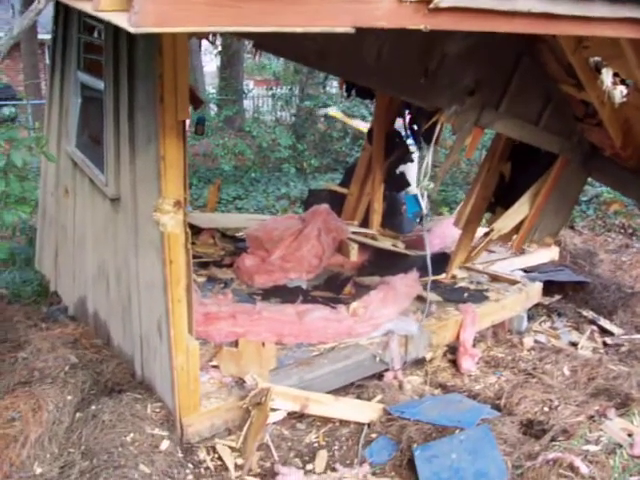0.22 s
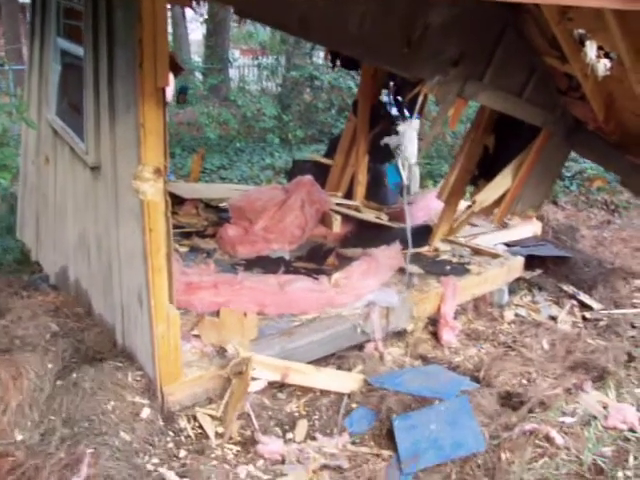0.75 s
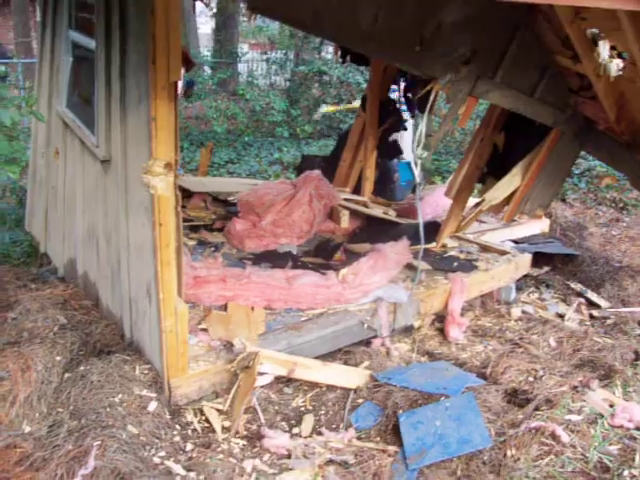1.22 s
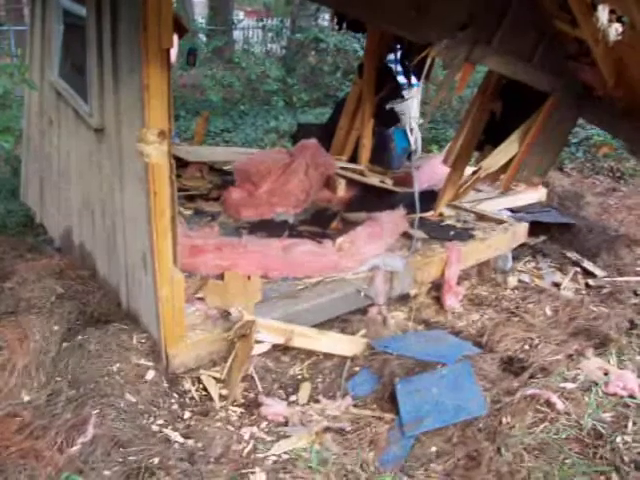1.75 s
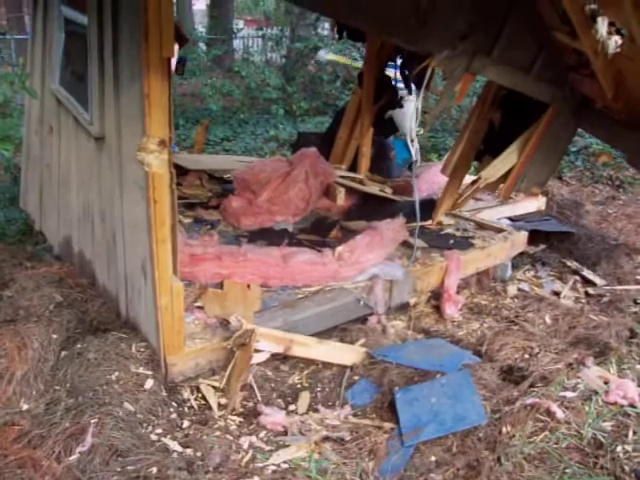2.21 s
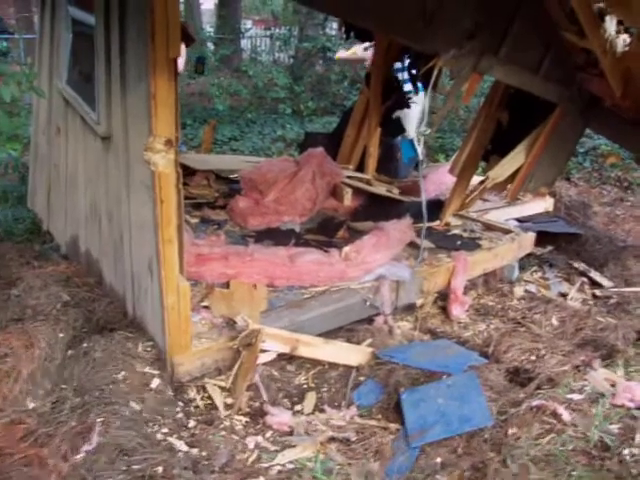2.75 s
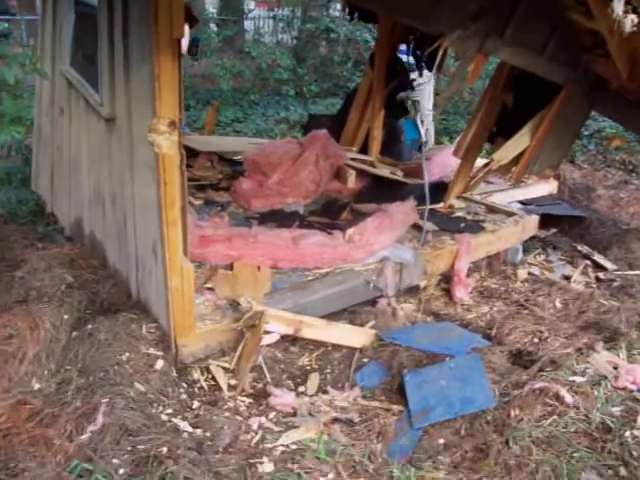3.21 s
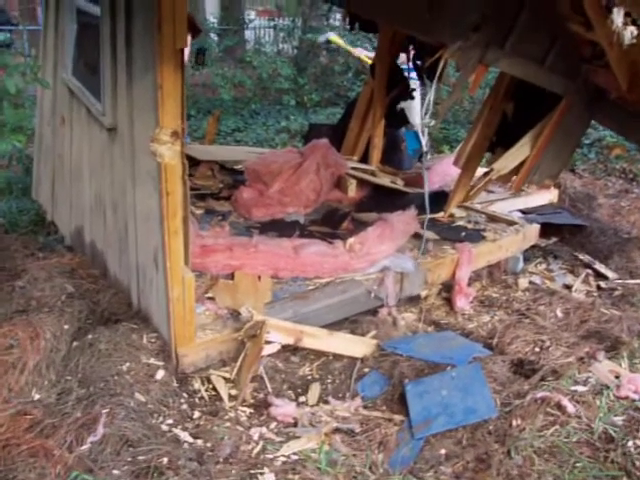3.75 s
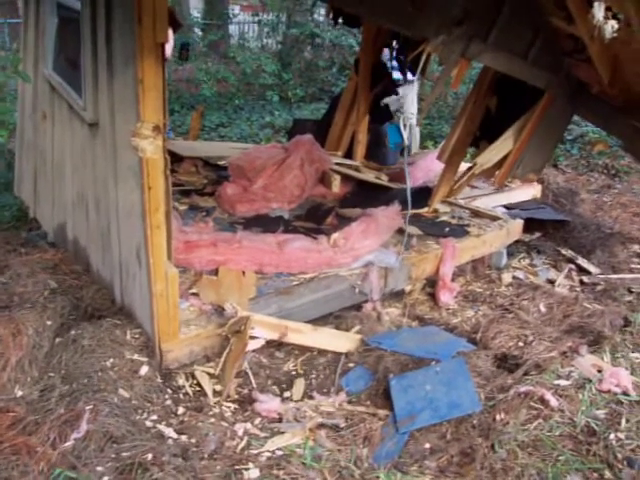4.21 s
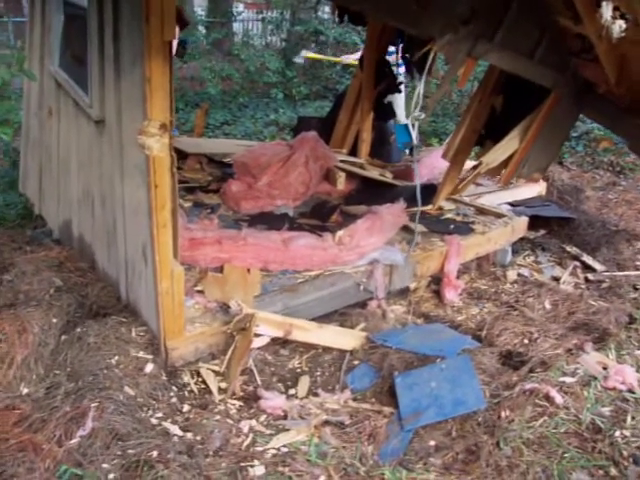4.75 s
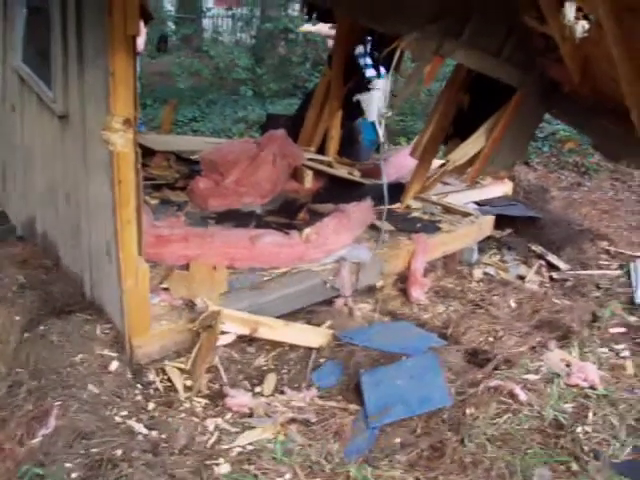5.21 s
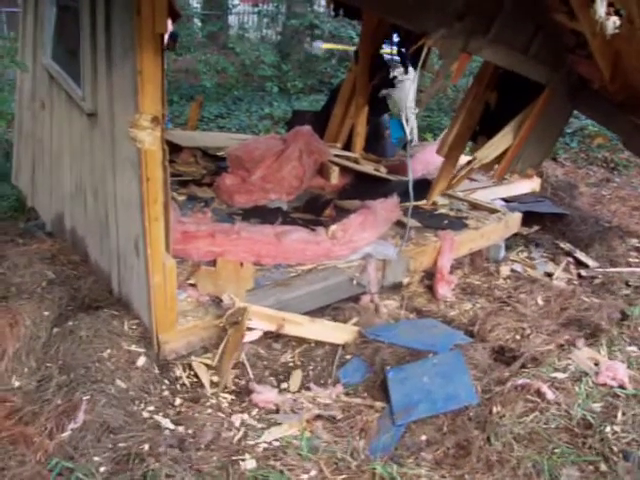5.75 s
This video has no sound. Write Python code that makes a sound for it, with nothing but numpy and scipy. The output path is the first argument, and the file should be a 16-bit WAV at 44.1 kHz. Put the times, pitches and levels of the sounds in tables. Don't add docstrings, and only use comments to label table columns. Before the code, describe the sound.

Outdoors at a wrecked wooden shed by trees, a sledgehammer hits the studs five times at a steady pace, just over a second apart. Each blow is a loud clipped crack with a woody ring and quick rebound, then a rough echo from trunks and house walls. Splinters, grit and offcuts tick and knock between blows. A small camera microphone overloads, ducks and recovers, over faint traffic hum and a thin high whine.

```python
import sys
import numpy as np
from scipy import signal
from scipy.fft import rfft, irfft
from scipy.io import wavfile
from scipy.ndimage import uniform_filter1d

SR = 44100
rng = np.random.default_rng(int(sys.argv[2]) if len(sys.argv) > 2 else 0)


def convert_level_to_amplitude(level_db):
    exponent = np.asarray(level_db, float) / 20
    return 10 ** exponent


def transcribe(u):
    v = np.clip(np.atleast_2d(u).T, -1, 1)
    q = np.round(v * 32767).astype(np.int16)
    wavfile.write(sys.argv[1], SR, q)


N = 264600


def evened(x):
    return x / np.sqrt(np.mean(x ** 2) + 1e-20)


def colour(x, points, lo_hz=0, hi_hz=1e5):
    f, db = np.transpose(points)
    hz = np.fft.rfftfreq(len(x), 1 / SR) + 1
    band = 1 / np.sqrt((1 + (lo_hz / hz) ** 8) * (1 + (hz / hi_hz) ** 8))
    shape = convert_level_to_amplitude(np.interp(np.log(hz), np.log(f), db))
    return evened(irfft(rfft(x) * shape * band, len(x)))


def ring(x, hz, width_hz):
    sharpness = np.clip(hz / width_hz, .3, 99)
    return signal.lfilter(*signal.iirpeak(np.clip(hz, 50, 9000), sharpness, SR), x)


def add(mix, s, sound):
    part = mix[round(s * SR):][:len(sound)]
    part += sound[:len(part)]


def random_clicks(per_second, spread_db, most):
    strength = convert_level_to_amplitude(spread_db * np.minimum(rng.exponential(1, N), most))
    return (rng.random(N) < per_second / SR) * strength * rng.choice([-1., 1.], N)


def slow_drift():
    return evened(uniform_filter1d(uniform_filter1d(rng.standard_normal(N), 5000), 5000))


# f/Hz, level/dB [per Hz]
TRAFFIC = [(12, -57.5), (25, -9), (80, -2), (202, -11.5), (470, -8.5), (600, -9), (850, -6), (1120, -12),
           (1300, -22), (1800, -29), (2400, -36), (3500, -30.5), (5100, -31), (7050, -26)]


def yard():
    hum = convert_level_to_amplitude(-36.5 + 0.63 * slow_drift()) * colour(rng.standard_normal(N), TRAFFIC)
    song = evened(ring(ring(rng.standard_normal(N), 6280, 90), 6280, 90))
    insect = convert_level_to_amplitude(-59.5 + 2.2 * slow_drift()) * song
    dust = evened(ring(ring(random_clicks(150, 3.0, 3), 6000, 2800), 6000, 2800))
    return hum + insect + convert_level_to_amplitude(-52.5) * dust


def whine():
    frame_hz = 30000 / 1001
    line_hz = 262.5 * frame_hz
    t = np.arange(N) / SR
    frames = t * frame_hz
    slips = 0
    for at, turns in ((.1, .5), (.6, 1)):
        slips = slips + turns * (np.floor(frames - at) + np.clip((frames - at) % 1 / .09, 0, 1))
    return convert_level_to_amplitude(-41) * np.cos(2 * np.pi * (line_hz * t - slips))


# t/s, level/dB, f/Hz, half length/s
STEPS = [(.6, -48, 90, 0.15), (1.738, -42.5, 218, 0.041), (2.79, -49, 84.7, 0.023),
         (3.608, -41.5, 150, 0.043), (4.072, -38, 184, 0.09), (4.2, -46, 300, 0.11),
         (5.003, -42, 165, 0.034), (0.25, -44, 5980, .025), (3.723, -52, 5000, 0.041),
         (4.007, -43, 6000, 0.044), (4.858, -33.5, 5530, .022), (4.902, -44.5, 5500, .05),
         (5.06, -43.5, 5500, 0.07), (1.447, -43, 218, 0.11)]


def steps():
    t = np.arange(N) / SR
    noise = rng.standard_normal(N)
    out = np.zeros(N)
    for s, db, hz, half in STEPS:
        puff = np.exp(-((t - s) / half) ** 2)
        out += convert_level_to_amplitude(db) * puff * evened(ring(ring(noise, hz, hz), hz, hz))
    return out


# delay t/s, level/dB, half length/s
WALLS = [
    (0.066, 1.5, .01),
    (0.11, 3.5, 0.03),
    (0.143, 1, 0.014),
]


def scatter(t, near_db, near_t60, trees_db, held, trees_t60):
    near_s, trees_s = .021, 0.085
    after = np.maximum(t, 0)
    near = np.clip((t - near_s) / .0088, 0, 1) * convert_level_to_amplitude(near_db - 60 * after / near_t60)
    late = np.maximum(t - trees_s - held, 0)
    deep_wood = convert_level_to_amplitude(-13.5 - 60 * late / 2.75)
    dying = np.hypot(convert_level_to_amplitude(-60 * late / trees_t60), deep_wood)
    trees = np.clip((t - trees_s) / 0.0048, 0, 1) * convert_level_to_amplitude(trees_db) * dying
    walls_db = sum(db * np.exp(-((t - s) / half) ** 2) for s, db, half in WALLS)
    return convert_level_to_amplitude(walls_db) * np.hypot(near, trees)


# t/s, level/dB, knock level/dB, hiss level/dB, near scatter level/dB
ECHOES = [
    (-.31, -0.5, 0, 0.5, 2.5),
    (0.8165, 0, -0.5, -2.5, 0.6),
    (1.9293, 0.73, 0.7, -0.2, -2),
    (3.145, -0.55, -0.9, -6, 2.3),
    (4.3466, 0.95, 1.7, 0, -1.5),
    (5.5156, -.6, 2, .6, 1.7),
]
# f/Hz, level/dB [per Hz]
WOODS = [(40, -3), (140, -2.5), (245, -11), (500, -15), (720, -9), (850, 0.5), (1050, -2.5), (1250, -14.5),
         (1900, -11.5), (2400, -10), (3200, -18), (3900, -15), (6400, -18.5), (7900, -25)]
# near level/dB, near t60/s, tree line level/dB, held/s, tree line t60/s
SCATTER = [
    (-15, 0.78, -26.5, 0.16, 1.27),
    (-25, 0.48, -25.5, 0.07, 0.55),
    (-19.5, 0.52, -34, 0.094, 1.3),
    (-19, 0.75, -29, 0.02, 0.67),
]


def echoes():
    t = np.arange(N) / SR
    trunks = random_clicks(4000, 1.13, 4)
    edges_hz = ((480, 1450), (1450, 3200), (3200, 1e5), (0, 480))
    bands = []
    for lo, hi in edges_hz:
        clump = uniform_filter1d(uniform_filter1d(rng.standard_normal(N), 400), 400)
        grouped = convert_level_to_amplitude(1.15 * evened(clump))
        bands.append(evened(colour(trunks, WOODS, lo, hi) * grouped))
    slow, out = t[::32], np.zeros(N)
    for s, db, knock_db, hiss_db, near_db in ECHOES:
        for band, (close_db, *rule), tone_db in zip(bands, SCATTER, (0, knock_db, hiss_db, 0)):
            strength = scatter(slow - s, close_db + near_db, *rule)
            out += convert_level_to_amplitude(db + tone_db) * np.interp(t, slow, strength) * band
    return out


# t/s, peak level/dB, f/Hz, t60/s
KNOCKS = [(1.2296, -7.5, 6530, 0.0026), (1.2302, -6.5, 220, 0.043), (1.2308, -17, 332, 0.048),
          (1.2313, -30, 567, 0.014), (1.2358, -3.5, 252, 0.014), (1.2359, -7.5, 377, 0.018),
          (1.2365, -24, 790, 0.045), (1.405, -32, 3100, 0.057), (1.4032, -24, 4130, 0.0042),
          (1.4562, -21, 902, 0.057), (1.508, -22, 4460, 0.0041), (1.5082, -18, 2640, 0.01),
          (1.233, -23, 454, 0.015), (0.2658, -16, 6100, 0.0047), (2.5022, -18.5, 5900, 0.0097),
          (2.553, -33, 2900, 0.039), (3.105, -19, 856, 0.026), (3.149, 3.5, 2700, 0.035),
          (3.1685, -6, 914, .02), (.8312, -2.5, 898, .05), (3.337, -6.5, 890, 0.032),
          (3.381, -11.5, 980, 0.021), (5.015, -22, 966, 0.064), (5.838, -18.5, 3780, 0.024)]


def knocks():
    out, t = np.zeros(N), np.arange(4000) / SR
    for s, db, hz, t60 in KNOCKS:
        soft_start = np.clip(2 * hz * t, 0, 1)
        add(out, s, -convert_level_to_amplitude(db - 60 * t / t60) * np.sin(2 * np.pi * hz * t) * soft_start)
    return out


# t/s, peak level/dB, f/Hz, relative snap level/dB
SPLINTERS = [(0.176, -30, 2870, 3), (0.4486, -31, 2600, -1), (0.7893, -36.5, 2780, 1),
             (1.175, -20.5, 5900, -5.5), (1.2277, -16, 4200, -6), (1.329, -28.5, 2430, -9),
             (1.3596, -27, 5900, -7), (1.405, -24, 3080, 5), (1.509, -24.5, 2620, 2),
             (1.585, -27, 2490, -2.5), (1.7927, -33, 2480, 2.5), (2.5506, -30.5, 3020, -6.5),
             (2.9182, -29.5, 2920, 0.5), (3.1055, -29.5, 3800, 6), (3.5176, -24.5, 2160, -1.5),
             (3.687, -32.5, 2450, 3.5), (3.6955, -27.5, 2470, 6.5), (3.7087, -23, 2880, -3),
             (3.7405, -22.5, 4290, -7.5), (3.8506, -25.5, 3970, -8), (4.1796, -28.5, 2750, -9),
             (4.2028, -26, 2860, -11), (4.8316, -15.5, 3800, -2), (5.0137, -21.5, 2520, 3.5),
             (5.041, -25, 3840, -0.5), (5.1108, -24, 2690, -7.5), (5.16, -25.5, 2940, -4.5),
             (5.8346, -25.5, 3850, -3.5), (1.21, -31, 2350, -0.5), (2.4127, -32, 2380, -6.5)]
# t/s, peak level/dB, f/Hz, relative snap level/dB
GRIT = [(0.1403, -19.5, 5600, 3), (0.2364, -20.5, 6060, -10), (0.265, -14, 5870, -15.5),
        (0.397, -27.5, 7200, -4), (0.737, -29.5, 6150, 3), (1.4364, -32.5, 6300, -1.5),
        (1.456, -26.5, 6360, -10.5), (1.6972, -27.5, 5530, -6), (1.7409, -22.5, 6300, -6),
        (2.5007, -27.5, 5820, -3), (2.877, -25, 5860, -2), (2.95, -25.5, 6750, -8),
        (2.9707, -20.5, 5960, -10), (3.715, -18.5, 5820, -8.5), (3.7303, -20.5, 5000, -9),
        (3.7695, -22, 5870, -6.5), (3.7915, -30.5, 6060, 3.5), (3.8174, -33.5, 5980, 4.5),
        (3.8818, -23, 5650, -3), (3.9, -27, 5200, 1), (3.988, -26, 5720, 1.5), (3.995, -20, 6350, -7.5),
        (4.0078, -14, 5900, -14), (4.033, -24.5, 5930, -5.5), (4.0675, -29.5, 5900, 2.5),
        (4.253, -21, 6070, -12), (4.8414, -13, 5720, -9), (4.8677, -24.5, 5530, 2),
        (5.0934, -26.5, 4800, 1), (5.2859, -32.5, 6500, -2)]


def chips():
    out, t = np.zeros(N), np.arange(4000) / SR
    wide = signal.butter(2, [2200, 7500], "bandpass", fs=SR)
    for table, t60 in ((SPLINTERS, 0.044), (GRIT, 0.038)):
        for s, db, hz, snap_db in table:
            noise = rng.standard_normal(len(t))
            fade = convert_level_to_amplitude(-60 * t / .005) + convert_level_to_amplitude(-2.5 - 60 * t / t60)
            snap = convert_level_to_amplitude(snap_db + 2.5) * fade * evened(signal.lfilter(*wide, noise))
            tone = convert_level_to_amplitude(-60 * t / t60) * evened(ring(noise, hz, 600))
            add(out, s - .0003, convert_level_to_amplitude(db - 12.5) * (tone + snap))
    return out


# f/Hz, level/dB [per Hz]
CRACK = [(180, -47), (300, 1), (579, -12.5), (909, 7.5), (1330, -10.5), (2830, -4.5), (3480, -25.5),
         (3820, -4), (5240, -15), (6090, -7), (7900, -17), (10300, -56.5), (17400, -120)]


def crack(length):
    return colour(rng.standard_normal(length), CRACK)


# t/s, level/dB, t60/s
REBOUNDS = [
    (.8385, 0.5, 0.018),
    (1.9475, 4, 0.011),
    (3.1679, 1, 0.013),
    (4.3665, 9, 0.007),
    (5.5286, 1, 0.014),
]


def rebounds():
    out, t = np.zeros(N), np.arange(4096) / SR
    for s, db, t60 in REBOUNDS:
        add(out, s, convert_level_to_amplitude(db - 60 * t / t60) * np.clip(t / 0.00091, 0, 1) * crack(len(t)))
    return out


# f/Hz, relative level/dB, t60/s
STUD = [(754.4, -2, 0.12), (842, -7.5, 0.12), (935, -15, 0.015), (1069, -11, 0.1), (1976, -6.5, 0.13),
        (2700, -7, 0.081), (680, -25.5, 0.031), (278.4, 3.5, 0.042), (420, -9.5, .04)]


def stud_ring(t):
    out = 0
    for hz, db, t60 in STUD:
        fade = convert_level_to_amplitude(db - 60 * np.maximum(t, 0) / t60)
        out = out + fade * np.sin(2 * np.pi * (hz * t + rng.random()))
    return out


def blow(db, tick_db, push_db, stud_db):
    t = np.arange(16384) / SR - .004
    after = np.maximum(t, 0)
    steel = evened(ring(rng.standard_normal(len(t)), 3340, 830))
    tick = convert_level_to_amplitude(tick_db + 10000 * np.minimum(t, 0) - 60 * after / 0.0097) * steel
    late = np.maximum(t - .0015, 0)
    push = -convert_level_to_amplitude(push_db - 60 * late / 0.024) * np.sin(2 * np.pi * 212.4 * late)
    rise = np.clip(t / 0.0051, 0, 1) ** 2
    fibres = convert_level_to_amplitude(-60 * np.maximum(t - .0085, 0) / 0.026) * crack(len(t))
    low_noise = evened(ring(rng.standard_normal(len(t)), 260, 270))
    thump = convert_level_to_amplitude(push_db - 13.0 - 60 * after / 0.12) * low_noise
    wood = fibres + thump + convert_level_to_amplitude(stud_db) * stud_ring(t)
    sway = convert_level_to_amplitude(-25.5) * np.exp(-((t - .13) / 0.054) ** 2) * np.sin(2 * np.pi * 48 * after)
    return tick + push + sway + convert_level_to_amplitude(db - 4.5) * rise * wood


# t/s, level/dB, steel tick level/dB, low push level/dB, relative stud ring level/dB
BLOWS = [
    (0.8177, 11.5, -20.5, 4, -10.5),
    (1.9284, 10, -5.5, 6, -8),
    (3.1455, 8.5, -17, -4, -13),
    (4.3469, 13, -13.5, 4, -8),
    (5.5138, 11.5, -7, 1, -3),
]


def scene():
    mix = yard() + whine() + steps() + echoes() + knocks() + chips() + rebounds()
    for s, *row in BLOWS:
        add(mix, s - .004, blow(*row))
    return mix[None]


def low_pass(x):
    return signal.sosfilt(signal.butter(12, 16790, fs=SR, output="sos"), x)


def record(dry):
    camera_hz = 16000
    power_db = 10 * np.log10(abs(signal.lfilter(np.ones(300) / 300, 1, dry[0] ** 2)) + 1e-12)
    fall = np.arange(N) * 38.3 / SR
    held_db = np.maximum.accumulate(np.minimum(power_db, -2) + fall) - fall
    over_db = np.clip(held_db + 10.0, 0, None)
    ducked = dry[0] / convert_level_to_amplitude(signal.lfilter(np.ones(400) / 400, 1, over_db))
    hz = np.fft.rfftfreq(N, 1 / SR)
    sampled = irfft(rfft(np.clip(ducked, -.72, .72)) * (hz < camera_hz / 2), N)
    mirrored = sampled * (1 + 2 * np.cos(2 * np.pi * camera_hz * np.arange(N) / SR))
    edge_db = np.interp(hz, [20, 45, 7000, 7700, 8150, 8600, 8950, 9150],
                        [-4, 0, -1.5, -4.5, -10.5, -22, -35.0, -120])
    smooth = irfft(rfft(mirrored) * convert_level_to_amplitude(edge_db), N)
    clipped = np.clip(smooth, -.7, .7)
    top = signal.firwin(255, 16300, window=("kaiser", 9), fs=SR)
    finished = signal.oaconvolve(clipped, top, "same")[None]
    return low_pass(finished)


dry = scene()
out = record(dry)
transcribe(out)
```